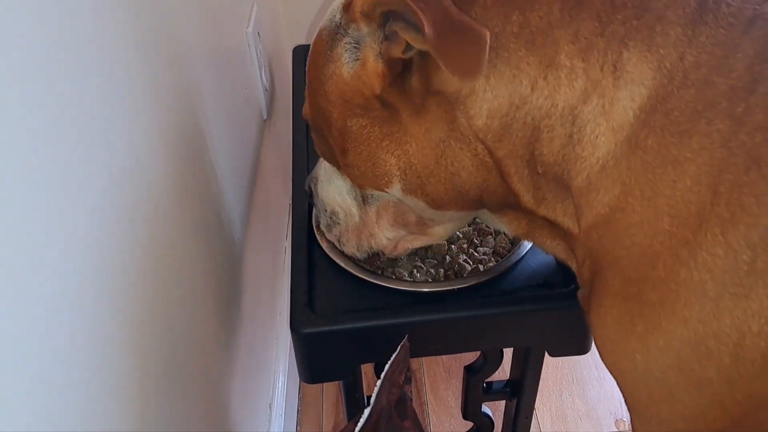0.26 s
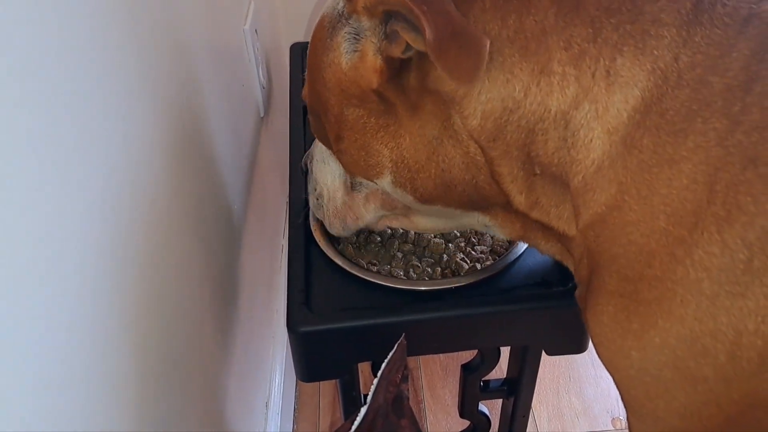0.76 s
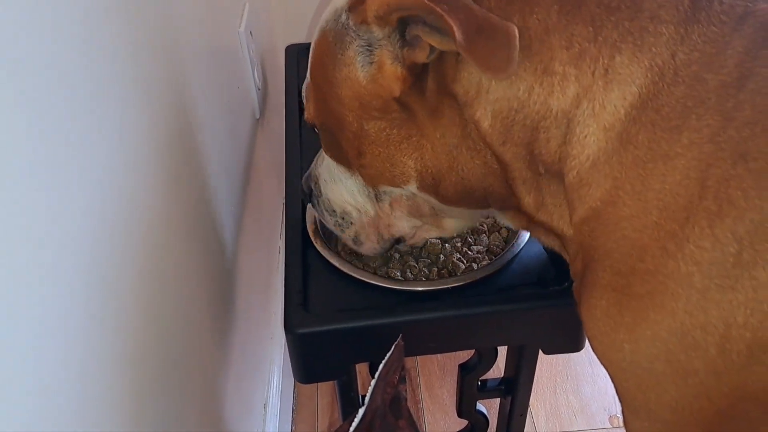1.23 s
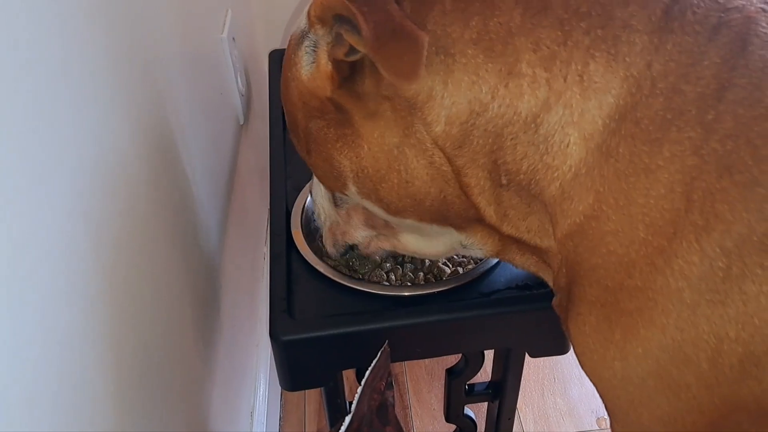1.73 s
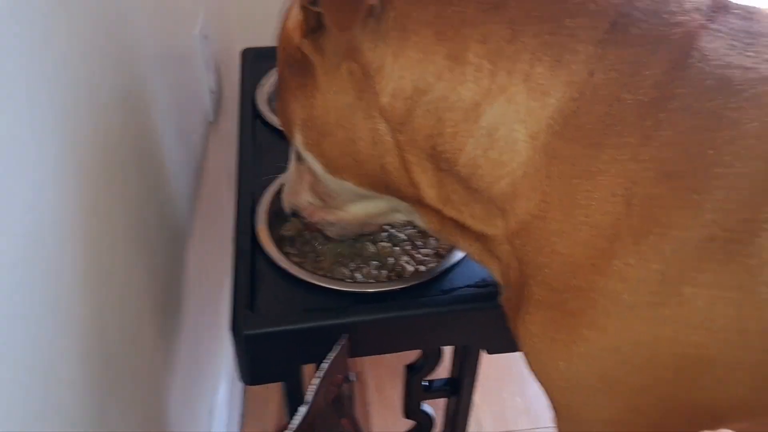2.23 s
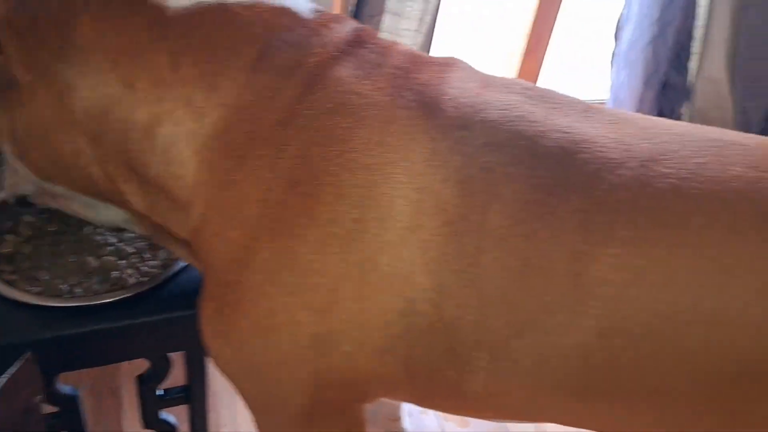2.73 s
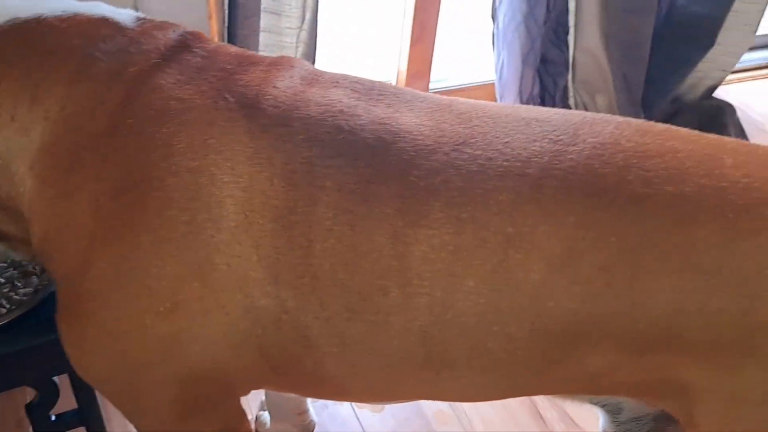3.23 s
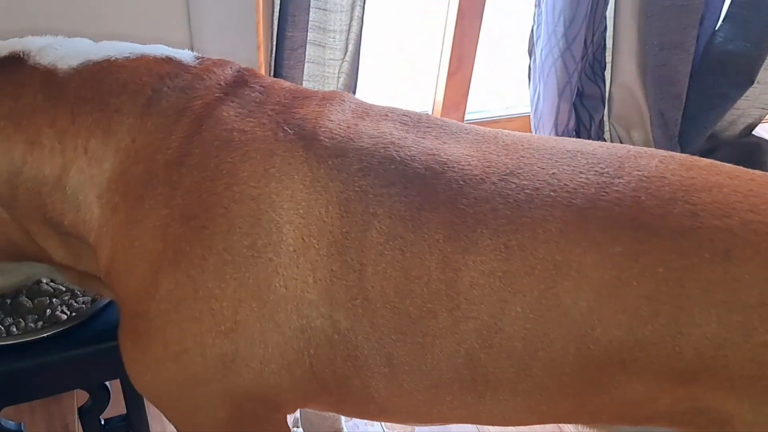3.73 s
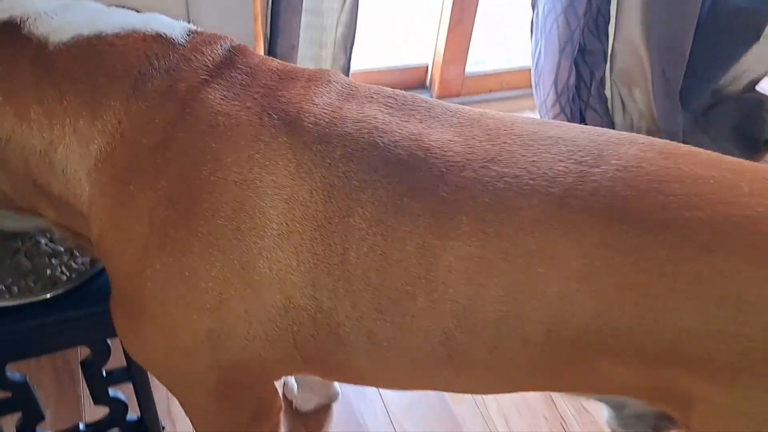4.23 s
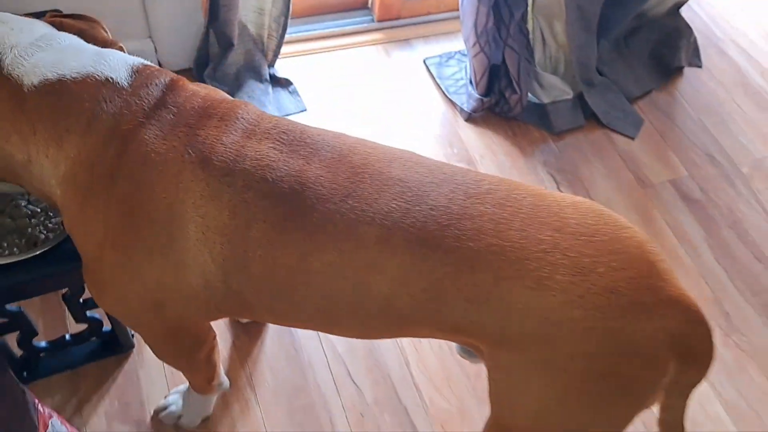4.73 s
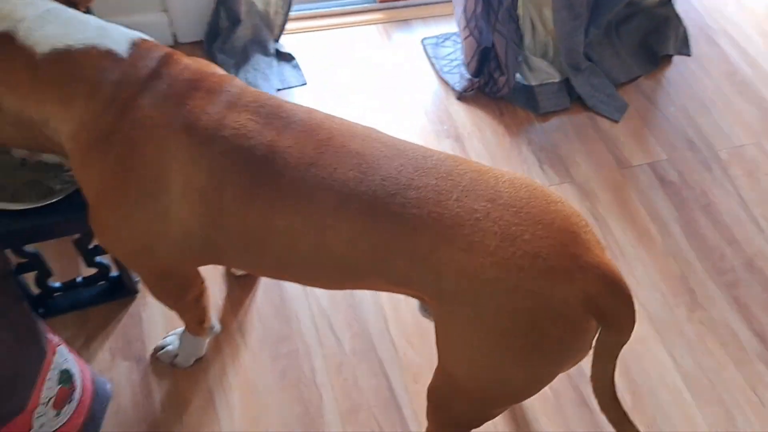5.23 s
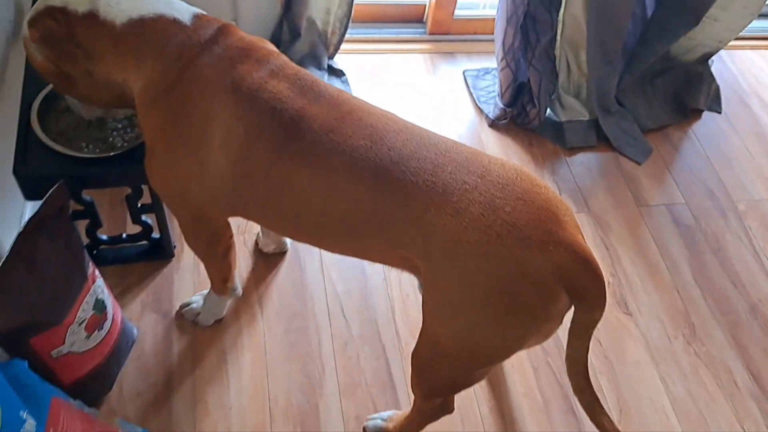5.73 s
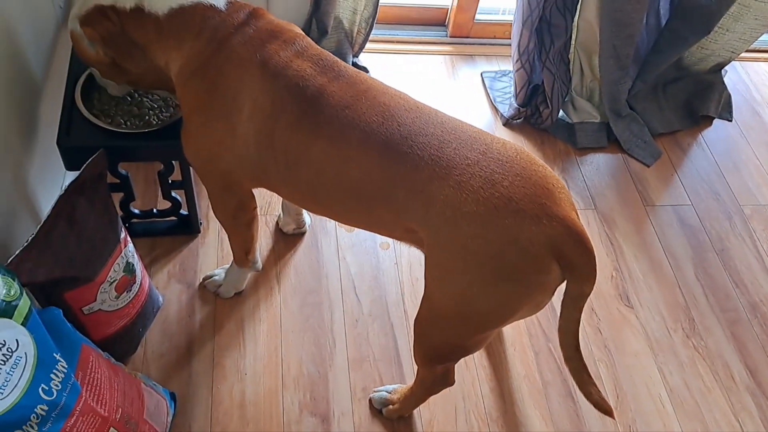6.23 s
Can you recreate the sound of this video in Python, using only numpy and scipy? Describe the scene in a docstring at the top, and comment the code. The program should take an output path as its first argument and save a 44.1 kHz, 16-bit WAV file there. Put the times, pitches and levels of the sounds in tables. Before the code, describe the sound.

A dog crunches dry kibble close by while a second dog further off yelps, barks three times, whines and snorts in a room.

```python
"""Crunching kibble is heard first: a dog eats close by, over a low hum and the soft air of a room.
Further off a second dog yelps once, whimpers faintly, barks three times, then whimpers again,
whines through its nose and snorts. Crunches are clumps of tiny clicks that ring; yelp and barks are
stacks of harmonics plus rasping noise. Whines are nearly pure tones, the snort is shaped noise,
and the hum is a low tone with its octave."""
import sys
import numpy as np
from scipy import signal
from scipy.fft import rfft, irfft, next_fast_len
from scipy.io import wavfile
from scipy.ndimage import uniform_filter1d, minimum_filter1d, map_coordinates

SR = 44100
rng = np.random.default_rng(int(sys.argv[2]) if len(sys.argv) > 2 else 0)


def store_wav(level_fs):
    """Save 16-bit WAV to argv[1]."""
    pcm = np.round(np.clip(np.atleast_2d(level_fs), -1, 1) * 32767)
    wavfile.write(sys.argv[1], SR, pcm.T.astype(np.int16))


N = 285327  # length of the scene [samples]

# Levels in the tables are relative: the functions below trim, filter and place the sounds further.
# Spectra are lists of (frequency [Hz], level [dB per Hz]); colour() evens out their overall level.

# how long echoes last: (frequency [Hz], time to die by 60 dB [s])
ECHO_TIMES = [(200, 0.31), (1000, 0.59), (2200, 0.59), (4000, 0.58), (8000, .55), (14000, 0.93)]
# strength of the hum and of its octave: (time [s], level [dB])
HUM_LEVEL = [(0.0, -61), (0.23, -60.5), (0.36, -81), (1.58, -74), (2.31, -53), (2.58, -68), (2.67, -57),
             (3.03, -53.5), (3.19, -74), (4.13, -68), (4.42, -77.5), (4.96, -61), (5.15, -82), (5.28, -65),
             (5.78, -58.5), (5.86, -73), (5.95, -57), (6.47, -60.5)]
OCTAVE_LEVEL = [(0.0, -62.5), (0.95, -80), (1.77, -72), (1.84, -62), (1.93, -72), (2.43, -61), (2.54, -79),
                (2.59, -67), (2.9, -62), (3.1, -66), (5.06, -73), (5.89, -68), (6.0, -56), (6.47, -62)]
# strength of the room's soft air: (time [s], level [dB])
AIR_LEVEL = [(0.0, -59), (0.18, -63.5), (0.4, -66.5), (0.97, -71.5), (1.37, -73), (2.81, -61.5),
             (3.44, -67), (3.62, -69.5), (4.31, -65), (5.32, -70.5), (5.8, -66), (6.04, -60), (6.25, -66),
             (6.47, -67)]
# spectrum of the air shared by both microphones: (frequency [Hz], level [dB per Hz])
AIR_SPECTRUM = [(15, -39), (25, -10), (119, 0), (215, 1.5), (457, -4), (804, -5.5), (1000, -25),
                (1300, -14.5), (2120, -19.5), (3830, -27.5), (5140, -28.5), (9000, -30), (15500, -37)]
# spectrum of the air that is opposite left and right: (frequency [Hz], level [dB per Hz])
SIDE_SPECTRUM = [(30, -8.5), (120, -3), (400, -3.5), (2500, -24.5), (5000, -23), (15000, -31.5)]
HUM_HZ = 58.6
TOP_HZ = 15850  # nothing sounds above this

# tones of the whimpers and whines, then thin whistles of the nose, both as
# (start [s], length [s], opening pitch [Hz], pitch it slides towards [Hz], level [dB])
WHIMPERS = [(1.21, 0.16, 796, 410, -63), (4.35, 0.17, 560, 414, -50.5), (4.82, 0.15, 482, 366, -50.5),
            (5.23, .19, 726, 479, -46), (5.6, 0.025, 1143, 1022, -47), (5.645, 0.17, 1058, 1131, -52),
            (5.715, 0.132, 1191, 1157, -39), (5.8, 0.26, 1175, 1149, -35.5)]
WHISTLES = [(1.13, .24, 6610, 7200, -79.5), (4.8, 0.091, 7830, 7670, -72.5), (5.09, 0.14, 6720, 6770, -70),
            (5.595, .07, 6880, 6930, -67.5), (5.69, 0.16, 12460, 12500, -68.5)]
SETTLE_SHARE = .36  # time constant of the slide, as a part of the tone's length
# puffs of the snort, the first a sharp pop:
# (peak [s], tenfold rise [s], tenfold fall [s], rush [dB], hiss [dB])
PUFFS = [(5.969, .004, .02, -42.5, -32.5), (5.99, 0.22, .22, -49, -60.5), (6.125, 0.13, .12, -37.5, -48),
         (6.36, 0.058, 0.12, -54, -61)]
# spectra of the rush through the nostrils and of the hiss: (frequency [Hz], level [dB per Hz])
NOSTRILS = [(150, -42), (250, -14), (297, -5.5), (471, -21.5), (505, -13), (559, -16.5), (968, -8),
            (1050, -11.5), (1820, -0.5), (4150, -7.5), (6370, -33.5), (15000, -25)]
HISS = [(1500, -19), (3000, 1.5), (5000, 10.5), (9000, -4), (13000, -2.5), (16000, -16)]
# the throat's resonances, lifting or weakening each harmonic: (frequency [Hz], level [dB])
THROAT = [(400, -32), (650, -33), (800, -10), (1020, 2), (1300, -6.5), (1680, 7.5), (2100, 3), (2600, -7.5),
          (3400, -8), (4000, -22.5), (4800, -45), (5400, -30.5), (8000, -44.5), (13000, -40)]
# turbulent air in the open mouth: (frequency [Hz], level [dB per Hz])
RASP = [(200, -29.5), (420, -31.5), (560, -9), (720, -38.5), (930, 9), (1250, -4), (1680, 3), (2200, 2),
        (2800, -5.5), (3700, -19), (4700, -28.5), (9000, -36), (12500, -35), (16000, -42.5)]
# a small mouth radiates little bass: (frequency [Hz], level [dB])
MUZZLE = [(250, -51), (430, -21.5), (540, -1), (800, 2.5), (16000, 1)]
# the high cry: (start [s], full push after [s], peak after [s], release after [s], opening pitch [Hz],
#  pitch after the break, before sagging [Hz], pitch breaks after [s], level [dB], roughness [0-1],
#  brightness [dB per octave])
YELP = [(0.295, .031, .094, 0.093, 1477, 1226, .039, -9.5, .008, -4.5)]
# the barks: the ten columns of the yelp, then (bass [dB], treble [dB], second pitch enters after [s], # its
# pitch after sliding down 130 Hz, before sagging [Hz], its level [dB], its brightness [dB per octave])
BARKS = [(2.981, 0.015, 0.028, .135, 1125, 809.8, .015, -5, 0.6, 1.5, 5, 0, .027, 933, -13.5, -14.5),
         (3.603, .037, 0.062, .11, 1185, 1055, .013, -6.5, 0.32, 0.5, -9.5, -2.5, .055, 1162, -21.5, 5),
         (4.088, .017, 0.059, .128, 1028, 851.1, .015, -9, 0.4, 2, 4.5, 0.5, .03, 979, -12, -6.5)]
BARK_SWELL_DB_PER_S, BARK_SAG_HZ_PER_S = 69.5, 230
FADE_DB_PER_S, RELEASE_DB_PER_S = 170.5, 520  # the release slope comes on top of the fade
ONSET_S = 0.0045  # the voice sets in this fast
BREAK_S = .0028  # how fast the voice breaks into the full push and the lower pitch
ROUGHEN_S = 0.031  # time constant for the folds to break up
CRACK_ROUGH, CRACK_S = 0.18, 0.0056  # brief extra roughness as the full push comes, and its width
SHUT_DULL_DB = 7  # before the mouth is open the voice is duller by this much per octave
BASS_HZ, TREBLE_HZ = 650, 4060  # a bark's bass lies below the first, its treble above the second

# pushes of the muzzle or chews that shift loose pellets:
# (peak [s], length [s], jaw [dB], crack [dB], splinter [dB])
STIRS = [(.04, .42, -57.5, -51, -76.5), (.284, 0.039, -69, -47, -64.5), (.98, 0.17, -83, -62, -82),
         (1.12, .08, -61.5, -82, -88), (1.27, 0.24, -60.5, -58.5, -80), (1.436, 0.052, -58.5, -56.5, -79),
         (1.565, 0.16, -61.5, -56.5, -76), (1.774, 0.11, -62.5, -52.5, -72), (1.897, .2, -76, -62.5, -65.5),
         (2.089, .22, -61, -59.5, -63), (2.37, 0.19, -60, -50, -69), (2.555, .18, -59.5, -64, -53),
         (2.63, 0.12, -52.5, -49, -59), (2.777, .4, -66, -61, -64.5), (2.95, .12, -68.5, -58, -60),
         (4.69, 0.34, -66, -62, -61.5), (4.745, .07, -64, -46, -68), (5.03, .26, -59, -54, -58.5),
         (5.31, 0.16, -54, -49.5, -63.5), (5.47, 0.15, -56.5, -56, -74), (5.7, 0.14, -57.5, -53, -59)]
STIR_RISE_SHARE = 0.35  # part of a stir's length spent growing
# teeth cracking kibble: (time [s], crack [dB], jaw knock [dB], splinter [dB],
#  pellet ring [Hz], mouth cavity [Hz])
BITES = [(0.0268, -42.5, -47.5, -63.5, 1240, 950), (0.0688, -47, -51, -63.5, 1580, 580),
         (0.0991, -48, -52.5, -79, 2100, 730), (0.2528, -47.5, -66, -58.5, 2160, 570),
         (0.8839, -48, -53.5, -64.5, 2210, 730), (1.0122, -47.5, -58, -62, 1200, 500),
         (1.4351, -38, -48.5, -65, 2200, 690), (1.549, -53, -45, -58.5, 1580, 710),
         (1.7436, -49.5, -73, -70, 1670, 510), (1.953, -42, -47, -51, 2200, 710),
         (1.9862, -48, -51.5, -76.5, 2910, 670), (2.02, -35.5, -71, -65, 2640, 590),
         (2.087, -40.5, -63, -55.5, 1590, 620), (2.3329, -42, -63.5, -65, 1810, 720),
         (2.4078, -50.5, -45, -57.5, 1600, 620), (2.522, -61, -51, -73, 1220, 550),
         (2.611, -46, -41, -74.5, 1690, 720), (2.618, -31, -35, -62, 1670, 780),
         (2.658, -31.5, -42.5, -37, 1960, 790), (2.68, -32, -63, -60, 1250, 940),
         (2.7345, -54, -46, -53.5, 1890, 660), (2.8818, -39.5, -57.5, -58.5, 1990, 680),
         (2.9328, -39, -53, -63.5, 2180, 770), (2.9547, -42, -57, -48, 1240, 610),
         (3.501, -39, -56.5, -75.5, 2980, 660), (3.584, -40, -49.5, -57.5, 1200, 860),
         (4.026, -37, -50, -48, 2060, 980), (4.738, -35.5, -59, -58.5, 1480, 520),
         (5.017, -48, -53.5, -55.5, 1920, 620), (5.1137, -41, -59, -86, 1720, 530),
         (5.3052, -38, -41.5, -52, 1550, 520), (5.4641, -46, -63, -58.5, 1570, 510),
         (6.0686, -26, -69, -64, 2010, 650), (6.4333, -46, -49.5, -72, 1800, 820)]
# spectra of jaw, cracking and splintering: (frequency [Hz], level [dB per Hz])
JAW = [(200, -17), (450, -5), (700, 5.5), (900, -0.5), (1300, -33.5), (3000, -53.5)]
CRACK = [(500, -26), (1100, -8.5), (1700, -4.5), (2600, -7.5), (3600, -11.5), (5000, -22), (10000, -44)]
SPLINTER = [(2500, -20.5), (5000, 11.5), (7000, 4), (10000, -3.5), (13000, 3.5), (16000, -35)]


def amp(db):
    """Decibels to gain."""
    return 10 ** (np.asarray(db) / 20)


def unit(x):
    """Scale x to an average strength (rms) of 1."""
    return x / np.sqrt(np.mean(x ** 2) + 1e-20)


def along(points, hz):
    """Read (frequency, value) points at hz, on a log frequency axis."""
    f, v = np.transpose(points)
    return np.interp(np.log(hz + 1), np.log(f), v)


def curve(rows):
    """Turn (time, value) points into one value per sample."""
    return np.interp(np.arange(N) / SR, *np.transpose(rows))


def span(start, length):
    """The samples of an event, and the time since its start on them."""
    at = np.arange(max(int(start * SR), 0), min(int((start + length) * SR), N))
    return at, (at - at[0] + 1) / SR


def swell(peak, rise, fall):
    """A gain that grows tenfold in rise s up to its peak and drops tenfold in fall s."""
    t = np.arange(N) / SR - peak
    return 10 ** -np.maximum(-t / rise, t / fall)


def wobble(rate):
    """A smooth random curve through rate random values a second."""
    knots = rng.standard_normal(int(N * rate / SR) + 4)
    fine = np.arange(0, len(knots) - 1, .125)
    smooth = map_coordinates(knots, [fine])
    return np.interp(np.arange(N) * rate / SR, fine, smooth)


def colour(x, spectrum):
    """Filter x to a spectrum, without sounding ahead of x and keeping the power of white noise."""
    size = next_fast_len(N + 8192)
    gain = unit(amp(along(spectrum, np.fft.rfftfreq(2048, 1 / SR))))
    # folding the cepstrum forward makes the filter respond as early as it can
    cepstrum = irfft(np.log(gain + 1e-6))
    cepstrum[1:len(gain) - 1] *= 2
    cepstrum[len(gain):] = 0
    response = irfft(np.exp(rfft(cepstrum)))
    return irfft(rfft(x, size) * rfft(response, size), size)[..., :N]


def noise(spectrum):
    """Random noise with the given spectrum, at about rms 1."""
    return colour(rng.standard_normal(N), spectrum)


def grains(rate, spread_db):
    """Random tiny impacts of very unequal size, about rate a second, rms 1 in all."""
    size = amp(spread_db * np.minimum(rng.exponential(size=N), 4))
    return unit((rng.random(N) < rate / SR) * size * rng.choice([-1, 1], N))


def in_room(x, direct_db, room_db, right_db, left_lag=0, build=0.0011):
    """A source at two microphones: straight path (left_lag s later on the left), then a fading tail."""
    hz, t, z = signal.stft(rng.standard_normal((2, SR)), SR, nperseg=256)
    decay = amp(-60 * t / along(ECHO_TIMES, hz)[:, None])
    tail = signal.istft(z * decay, SR, nperseg=256)[1]
    tail = tail * (1 - np.exp(-np.arange(tail.shape[1]) / SR / build))  # echoes build up over build s
    wet = signal.fftconvolve(x[None], tail, axes=1)[:, :N]
    wet *= np.std(x) / np.std(wet, axis=1, keepdims=True)
    direct = np.array([np.roll(x, round(left_lag * SR)), x])
    balance = amp([[-right_db / 2], [right_db / 2]])
    return (amp(direct_db) * direct + amp(room_db) * wet) * balance


def background(hum_db=-1.0, octave_db=-1.5, air_db=4.0, side_db=-7, wander=.5, left_db=1):
    """A low hum and its octave swell and fade over soft air, which is partly opposite left and right."""
    phase = 2 * np.pi * HUM_HZ * np.arange(N) / SR + wander * wobble(3.8)
    octave_phase = 2 * phase + wander * wobble(11)
    hum = amp(hum_db + curve(HUM_LEVEL)) * np.sin(phase)
    octave = amp(octave_db + curve(OCTAVE_LEVEL)) * np.sin(octave_phase)
    apart = np.array([[1], [-1]])  # left, right
    side = amp(side_db) * noise(SIDE_SPECTRUM) * apart
    air = amp(air_db + curve(AIR_LEVEL)) * (noise(AIR_SPECTRUM) + side)
    return (np.sqrt(2) * (hum + octave) + air) * amp(left_db * apart / 2)


def snort(flutter_db=2, spray_db=-8):
    """The dog's nostrils pop open at the end of its whine; air rushes out with a wet crackle."""
    flow, hiss = sum(np.outer(amp(dbs), swell(peak, rise, fall)) for peak, rise, fall, *dbs in PUFFS)
    crackle = colour(grains(rate=400, spread_db=4), NOSTRILS)
    rush = noise(NOSTRILS) + amp(spray_db) * crackle
    return (flow * rush + hiss * noise(HISS)) * amp(flutter_db * wobble(120))


def whines(rows, overtone_db, waver, arch):
    """Nearly pure, slightly unsteady tones with a weak octave; each swells and fades as its pitch slides."""
    out, drift = np.zeros(N), wobble(90)
    for start, length, opening_hz, settled_hz, db in rows:
        at, t = span(start, length)
        hz = settled_hz + (opening_hz - settled_hz) * np.exp(-t / (SETTLE_SHARE * length))
        phase = 2 * np.pi * np.cumsum(hz * (1 + waver * drift[at])) / SR
        octave = amp(overtone_db) * (2 * hz < TOP_HZ) * np.sin(2 * phase)
        loudness = amp(db) * np.abs(np.sin(np.pi * t / length)) ** arch
        out[at] += loudness * np.sqrt(2) * (np.sin(phase) + octave)
    return out


def folds(pushes, top_db=0, jitter=.045, shimmer=0.42, rasp_db=0, half_db=-13, air_share=0.012):
    """Vocal folds sound through the throat; roughness adds jitter, unequal cycles and rasping air."""
    out = np.zeros(N)
    flutter, tremor, air = wobble(450), wobble(600), noise(RASP)
    k = np.arange(1, 14)[:, None]  # harmonic numbers
    for at, hz, db, rough, bright in pushes:
        rough = np.clip(rough, 0, 1)
        phase = 2 * np.pi * np.cumsum(hz * (1 + jitter * (rough + 0.021) * flutter[at])) / SR
        # a wider mouth lifts the overtones in the range of its resonances
        lift = bright * np.log2(k) * np.clip((4400 - k * hz) / 1100, 0, 1)
        gains = amp(along(THROAT, k * hz) - 1.9 * np.log2(k) + lift + top_db * (k > 3))
        tone = np.sum(gains * np.sin(k * phase), 0) / np.sqrt(np.sum(gains ** 2, 0) / 2)
        # unequal cycles put weak lines halfway between the harmonics
        halfway = 2 * amp(half_db) * np.cos(phase / 2)
        tone = tone * (1 + rough * (shimmer * tremor[at] + halfway))
        # air escapes in one puff a cycle
        puffs = air[at] * (1 + 0.38 * np.cos(phase))
        rasp = amp(rasp_db) * (rough + air_share) * puffs
        out[at] += amp(db) * (np.sqrt(1 - rough) * tone + rasp)
    return out


def cry(row, lead_in_db, swell_db_per_s, sag_hz_per_s, waver):
    """One push of air: a soft, dull lead-in; the mouth opens, pitch drops, folds roughen; then it fades."""
    start, full, peak, release, opening_hz, settled_hz, drop, level, rough, bright = row
    at, t = span(start, release + .08)
    # smooth steps from 0 to 1
    opened, dropped = [(1 + np.tanh((t - when) / BREAK_S / 2)) / 2 for when in (full, drop)]
    hz = opening_hz + (settled_hz - opening_hz) * dropped - sag_hz_per_s * t
    hz = hz * (1 + waver * wobble(70)[at])
    start_gain = 1 - np.exp(-(t / ONSET_S) ** 2)
    onset = 20 * np.log10(start_gain * (opened + amp(lead_in_db) * (1 - opened)))
    push = -np.maximum(swell_db_per_s * (peak - t), FADE_DB_PER_S * (t - peak))
    push = push - RELEASE_DB_PER_S * np.maximum(t - release, 0)  # cut off quickly
    roughness = rough * (1 - np.exp(-t / ROUGHEN_S))
    roughness = roughness + CRACK_ROUGH * np.exp(-((t - full) / CRACK_S) ** 2)
    return at, hz, level + onset + push, roughness, bright - SHUT_DULL_DB * (1 - opened * dropped)


def second_pitch(row, rise_s=0.039, fall_s=0.076, drop_hz=130, drop_s=.04, rough=0.11, edge_db=26):
    """Under full push the two folds part ways and a second, cleaner pitch swells and dies."""
    start, *_, delay, hz, level, bright = row
    at, t = span(start + delay, .17)
    arch = ((t - rise_s) / np.where(t < rise_s, rise_s, fall_s)) ** 2
    sliding_hz = hz + drop_hz * np.exp(-(t / drop_s) ** 2) - BARK_SAG_HZ_PER_S * t
    return at, sliding_hz, level - edge_db * arch, rough, bright


def yelp():
    """One high cry of the vocal folds, far cleaner than the barks."""
    pushes = [cry(row, lead_in_db=-21, swell_db_per_s=19.5, sag_hz_per_s=1680, waver=0.0033) for row in YELP]
    voice = folds(pushes, top_db=-1.5, jitter=0.05, shimmer=0.501, rasp_db=-4.0, half_db=-15.0,
                  air_share=0.003)
    return colour(voice, MUZZLE)


def barks():
    """Both pitches leave through the same mouth; each bark has its own share of bass and treble."""
    pushes = [cry(row[:10], lead_in_db=-11.0, swell_db_per_s=BARK_SWELL_DB_PER_S,
                  sag_hz_per_s=BARK_SAG_HZ_PER_S, waver=.018) for row in BARKS]
    first = folds(pushes, jitter=0.05)
    second = folds([second_pitch(row) for row in BARKS])
    voice = colour(first + second, MUZZLE)
    low = signal.butter(4, BASS_HZ, "low", fs=SR, output="sos")
    high = signal.butter(4, TREBLE_HZ, "high", fs=SR, output="sos")
    bass, treble = signal.sosfiltfilt(low, voice), signal.sosfiltfilt(high, voice)
    for row in BARKS:
        at, _ = span(row[0], .3)
        bass_db, treble_db = row[10:12]
        voice[at] += (amp(bass_db) - 1) * bass[at] + (amp(treble_db) - 1) * treble[at]
    return voice


def shifting(x, depth_db):
    """The moving tongue and cheeks give every moment its own resonances."""
    z = signal.stft(x, nperseg=512)[2]
    patch = np.outer(np.hanning(7), np.hanning(11))  # smooths over frequency and time
    field = signal.fftconvolve(rng.standard_normal(z.shape), patch, "same")
    return signal.istft(z * unit(amp(depth_db * unit(field))), nperseg=512)[1][:N]


def stirring(jaw_db=-1, crack_db=-1, splinter_db=-4):
    """Loose pellets rub and tick against each other and the teeth."""
    rise, fall = STIR_RISE_SHARE, 1 - STIR_RISE_SHARE
    force = sum(np.outer(amp(dbs), swell(peak, rise * length, fall * length)) for peak, length, *dbs in STIRS)
    force = force * amp([[jaw_db], [crack_db], [splinter_db]])
    ticks = grains(rate=520, spread_db=3.7)
    rubbing = sum(colour(f * ticks, body) for f, body in zip(force, (JAW, CRACK, SPLINTER)))
    return shifting(rubbing, depth_db=4)


def burst(envelope, fractures):
    """Fractures under an envelope, carrying just the envelope's energy."""
    return unit(envelope * fractures) * np.sqrt(np.mean(envelope ** 2))


def resonate(x, hz, q, share):
    """Part of x passes through a resonance, at about equal power."""
    ring = signal.lfilter(*signal.iirpeak(hz, q, SR), x) * np.sqrt(SR * q / hz / np.pi)
    return (1 - share) * x + share * ring


def bites(crack_db=-7, splinter_db=1, knock_t60=0.024, crack_t60=0.042, crumble_db=-17, crumble_t60=.16,
          clump_db=3):
    """A pellet snaps in clumps of tiny fractures, rings at its own pitch, knocks the mouth and crumbles."""
    force, t = np.zeros((3, N + SR)), np.arange(SR // 4) / SR
    # each t60 is the time in which that envelope dies by 60 dB [s]
    snap, thud = amp(-60 * t / crack_t60), amp(-60 * t / knock_t60)
    crumble = amp(crumble_db - 60 * t / crumble_t60)
    fractures = np.pad(grains(rate=3700, spread_db=2.0), (0, SR))
    crumbs = np.pad(grains(rate=220, spread_db=5.5) * amp(clump_db * wobble(93)), (0, SR))
    for s, crack, knock, splinter, pellet_hz, cavity_hz in BITES:
        at = int(s * SR) + np.arange(len(t))
        breaking = burst(snap, fractures[at]) + burst(crumble, crumbs[at])
        knocking = burst(thud, fractures[at])
        force[0, at] += amp(knock) * resonate(knocking, cavity_hz, q=9, share=0.12)
        force[1, at] += amp(crack + crack_db) * resonate(breaking, pellet_hz, q=10, share=0.18)
        force[2, at] += amp(splinter + splinter_db) * breaking
    return sum(colour(f[:N], body) for f, body in zip(force, (JAW, CRACK, SPLINTER)))


def scene():
    """The eating dog is close; the other one is further off, with more of the room in its voice."""
    snorting = in_room(snort(), direct_db=1, room_db=-3.5, right_db=5.0, left_lag=-.00009)
    whimpering = whines(WHIMPERS, overtone_db=-18.0, waver=0.0039, arch=1.42)
    whistling = whines(WHISTLES, overtone_db=-9.5, waver=0.0113, arch=0.83)
    pleading = in_room(whimpering + whistling, direct_db=-2, room_db=-1, right_db=2.5, left_lag=-.0002)
    yelping = in_room(yelp(), direct_db=-5.5, room_db=-0.5, right_db=5.0, left_lag=.00004, build=0.0038)
    barking = in_room(barks(), direct_db=-7, room_db=-1.5, right_db=4.0, left_lag=0.00029, build=0.002)
    eating = in_room(bites() + stirring(), direct_db=-3, room_db=-8.5, right_db=6.5, left_lag=.00007,
                     build=0.0025)
    return background() + snorting + pleading + yelping + barking + eating


def record(dry, ceiling=.9):
    """A limiter smoothly turns down peaks above the ceiling; nothing is kept above the band limit."""
    needed = np.minimum(1, ceiling / (np.abs(dry).max(0) + 1e-9))
    gain = uniform_filter1d(minimum_filter1d(needed, size=441), size=441)
    size = next_fast_len(N + 8192)
    kept = np.fft.rfftfreq(size, 1 / SR) < TOP_HZ
    return irfft(rfft(dry * gain, size) * kept, size)[:, :N]


dry = scene()
out = record(dry)
store_wav(out)
```